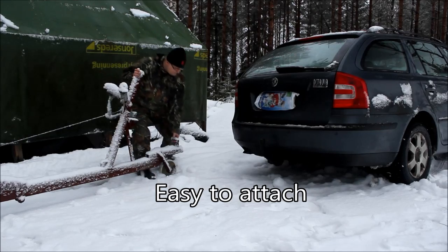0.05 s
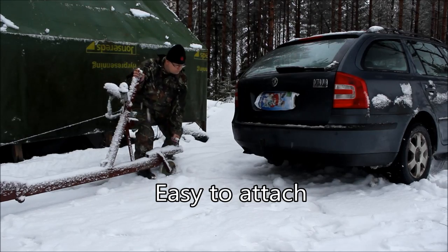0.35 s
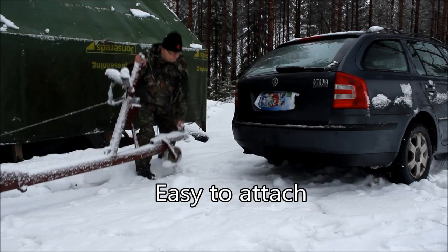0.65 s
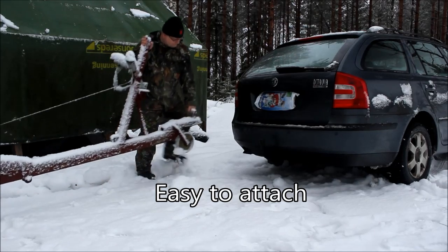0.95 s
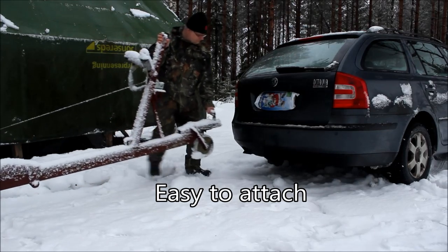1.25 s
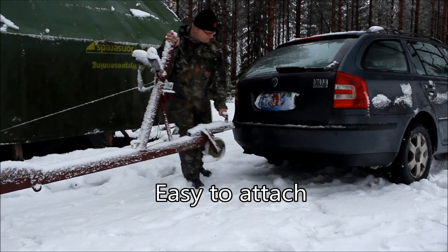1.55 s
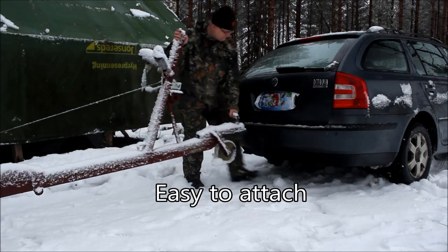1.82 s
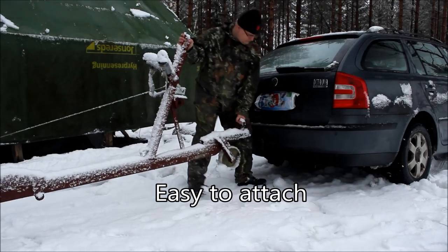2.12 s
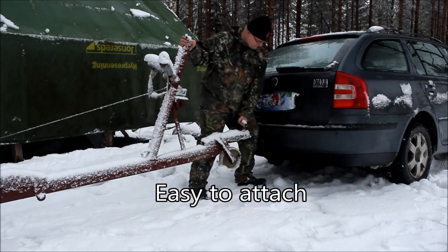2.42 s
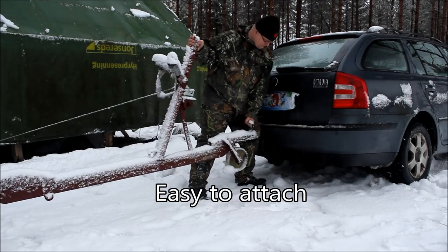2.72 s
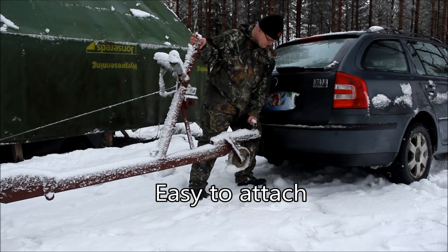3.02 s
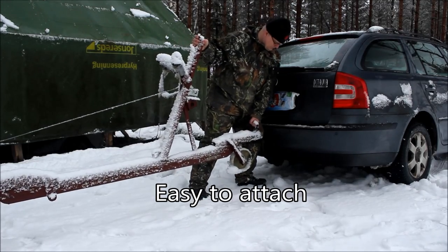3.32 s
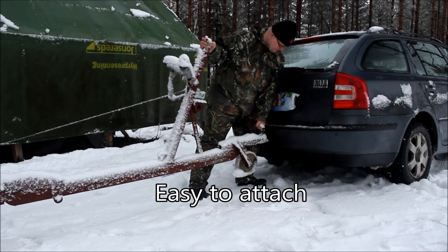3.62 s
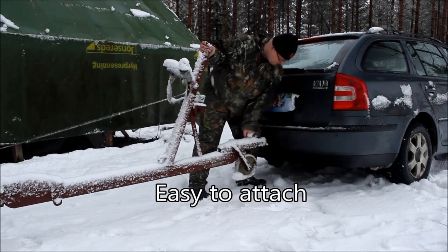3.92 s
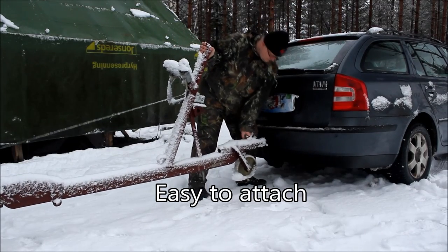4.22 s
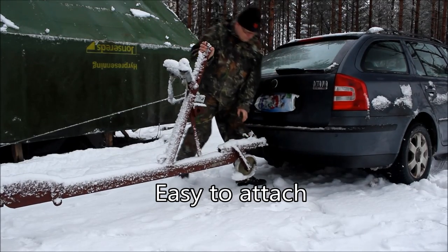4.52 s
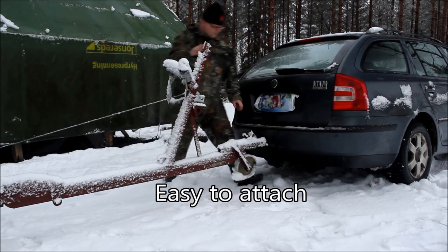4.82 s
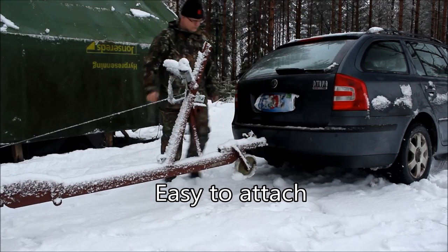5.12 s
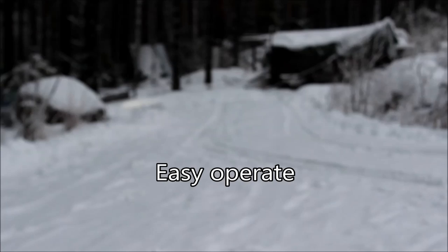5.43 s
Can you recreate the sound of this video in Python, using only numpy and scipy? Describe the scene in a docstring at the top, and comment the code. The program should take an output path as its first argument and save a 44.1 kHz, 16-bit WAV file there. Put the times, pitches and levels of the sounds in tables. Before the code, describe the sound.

In quiet, snowy outdoor air, uneven footsteps crunch and scuff, with light fabric rustle and small icy snaps. Then steel knocks on steel and a trailer hitch lands with a loud, ringing clank and a low hollow rumble. Bright clinks follow and weaken among dull footfalls, before a brief, faint hum of a car driving on snow. The sound is fairly close and dry, with only a slight dull tail.

```python
"""A steel trailer coupler scrapes and drops onto a car's tow ball with a clank: the drawbar rings,
the hollow body rumbles and a loose steel part rattles to rest. Leading up to it, a man drags the
drawbar through cold snow, which crunches, slides and packs under his boots as his clothes swish.
At the very end the scene changes to a car running along a snowy track."""
import sys
import numpy as np
from scipy import signal
from scipy.fft import rfft, irfft
from scipy.io import wavfile
from scipy.ndimage import uniform_filter1d

SR = 44100
rng = np.random.default_rng(int(sys.argv[2]) if len(sys.argv) > 2 else 0)


def wav_out(sig):
    """Save sig, one row per channel (or a flat mono array), as 16-bit PCM at SR to the path in sys.argv[1]."""
    wavfile.write(sys.argv[1], SR, np.round(np.clip(np.atleast_2d(sig).T, -1, 1) * 32767).astype(np.int16))


N = 249606
TIME = np.arange(N) / SR


def from_db(db):
    """Decibels to gain."""
    return 10 ** (np.asarray(db) / 20)


def rms_one(x):
    """Scale to rms 1."""
    return x / np.sqrt(np.mean(x ** 2) + 1e-20)


def fade(t, t60):
    """A decay that falls 60 dB in t60 seconds."""
    return 1000.0 ** (-t / max(t60, 1e-3))


def add(out, s, sound):
    """Mix a sound in at s seconds."""
    start = int(s * SR)
    out[start:start + len(sound)] += sound[:N - start]


def band(x, low_hz, high_hz, order=2):
    """High-pass, then low-pass; rms 1."""
    low_cut = signal.butter(2, min(low_hz, SR / 3), "high", fs=SR, output="sos")
    high_cut = signal.butter(order, min(high_hz, SR / 3), fs=SR, output="sos")
    return rms_one(signal.sosfilt(high_cut, signal.sosfilt(low_cut, x + 1e-18)))


def coloured(x, spectrum):
    """Shape a steady texture with an EQ curve; rms 1."""
    hz, db = np.transpose(spectrum)
    bins_hz = np.maximum(np.fft.rfftfreq(N, 1 / SR), 1)
    gain = from_db(np.interp(np.log(bins_hz), np.log(hz), db))
    return rms_one(irfft(rfft(x) * gain, N))


def grains(per_s, spread_db, size=N):
    """Random tiny fractures of uneven strength; rms 1."""
    strength = from_db(spread_db * np.minimum(rng.exponential(1, size), 4))
    polarity = rng.choice([-1, 1], size)
    return rms_one(strength * polarity * (rng.random(size) < per_s / SR))


def pop(t, hz, cycles):
    """A rounded pulse that swells for the given number of cycles, then dies; height 1."""
    age = t * hz / cycles
    wave = age * np.exp(-age) * np.sin(2 * np.pi * hz * t)
    return wave / np.abs(wave).max()


def struck(t, modes, vary_db):
    """Every blow excites each mode with a strength and sign of its own."""
    ring = np.zeros(len(t))
    for hz, db, t60 in modes:
        strength = from_db(db + vary_db * rng.standard_normal()) * rng.choice([-1, 1])
        ring += strength * fade(t, t60) * np.sin(2 * np.pi * hz * t)
    return ring


def air():
    """A soft, dark bed of outdoor air."""
    # The air's tone. Each row: frequency in Hz, relative level in dB.
    air_spectrum = [(15, -48), (25, -7.5), (195, -1.5), (229, -1.5), (270, -2.5), (427, -2.5), (516, -4),
                    (607, -7.5), (659, -4.5), (863, -7), (1700, -15), (4870, -20), (5880, -22.5),
                    (16000, -29)]
    return from_db(-48) * coloured(rng.standard_normal(N), air_spectrum)


def car(start_s=5.485, fade_in_s=0.0069):
    """Low engine hum under the rush of tyres on snow."""
    # The engine's tones. Each row: frequency in Hz, rms level in dB.
    engine_tones = [(42, -49), (70, -52), (132, -54)]
    # The tyre rush. Each row: frequency in Hz, relative level in dB.
    tyre_spectrum = [(15, -28), (25, -3), (138, -13), (219, -27), (243, -40), (358, -25), (451, -11),
                     (569, -17), (665, -14), (737, -14.5), (1970, -17), (10000, -42), (12000, -57),
                     (15600, -76), (22000, -120)]
    hum = sum(np.sqrt(2) * from_db(db) * np.sin(2 * np.pi * (hz * TIME + rng.random()))
              for hz, db in engine_tones)
    tyres = from_db(-45) * coloured(rng.standard_normal(N), tyre_spectrum)
    return (hum + tyres) * np.clip((TIME - start_s) / fade_in_s, 0, 1)


def clearing(x, predelay_s=0.012):
    """Snow swallows most sound; the trailer wall and the trees scatter a faint dull tail."""
    t = TIME[:SR]
    scatter = band(rng.standard_normal(len(t)), low_hz=111, high_hz=1920)
    tail = scatter * fade(t, t60=0.39) * (t > predelay_s)
    return x + from_db(-24) * signal.fftconvolve(x, tail / np.linalg.norm(tail))[:N]


def thuds():
    """Heavy footfalls come through the ground as dull thuds."""
    # Each row: start in seconds, peak in dB, pitch in Hz.
    footfalls = [(4.459, -39, 53.5), (4.716, -31.5, 42.2), (4.782, -35, 58.3), (4.832, -30.5, 58.7),
                 (4.9, -36, 47.7)]
    out = np.zeros(N)
    for s, db, hz in footfalls:
        add(out, s, from_db(db) * pop(TIME[:SR // 4], hz, cycles=0.42))
    return out


def ticks():
    """Ice and clothing give short, bright snaps."""
    # Each row: start in seconds, level in dB, frequency in Hz that the filters follow.
    snaps = [(0.464, -42.5, 2600), (0.602, -39, 3470), (0.658, -38.5, 2300), (0.802, -33, 2490),
             (0.8233, -31, 2120), (0.906, -27, 1880), (1.047, -33, 4160), (1.283, -38, 2830),
             (1.406, -38, 2420), (1.487, -35, 7000), (2.245, -46, 10500), (2.425, -39, 2600),
             (2.925, -33, 1040), (3.045, -34.5, 1700), (3.284, -37, 1460), (3.944, -35, 7000),
             (5.208, -42, 7500)]
    out, t = np.zeros(N), TIME[:SR // 10]
    for s, db, hz in snaps:
        snap = band(rng.standard_normal(len(t)), low_hz=0.91 * hz, high_hz=0.77 * hz)
        add(out, s, from_db(db) * snap * fade(t, t60=0.053))
    return out


def footwork(range_db=23, sag_db_per_s=8):
    """Envelopes for slide, swish and packing: each step rises, sags under the weight and releases."""
    # Strides and shuffles. Each row: landing time, rise, hold and release in seconds,
    # then relative levels in dB of boot slide, clothes swish and snow packing.
    steps = [(0.499, 0.081, 0.0083, 0.14, -47.5, -52, -47), (0.659, 0.041, 0.15, .04, -45.5, -58, -58),
             (0.827, .03, 0.14, 0.22, -37.5, -56.5, -50), (1.119, 0.23, 0.05, .14, -33, -44, -45),
             (1.536, 0.28, 0.27, 0.099, -33.5, -49.5, -42.5), (1.984, .06, 0.0093, 0.1, -43.5, -53, -39.5),
             (2.277, 0.033, .035, 0.045, -39, -51.5, -40), (2.423, 0.21, 0.077, 0.084, -54, -63, -62),
             (2.609, 0.13, 0.24, 0.13, -36.5, -59.5, -47), (3.285, .015, 0.029, 0.039, -38.5, -64, -45),
             (3.376, 0.027, 0.21, 0.14, -36, -57, -39.5), (3.635, .12, 0.14, 0.065, -35.5, -52.5, -33.5),
             (4.628, 0.1, 0.18, .22, -44, -53.5, -53), (5.017, 0.12, 0.093, .06, -60, -74, -44.5),
             (5.296, 0.23, 0.052, 0.069, -51, -60, -50)]
    power = np.zeros((3, N))
    for s, rise, hold, release, *levels_db in steps:
        t = TIME - s
        away = np.maximum(-t, 0) / rise + np.maximum(t - hold, 0) / release   # 0 during the hold
        effort = from_db(-range_db * np.minimum(away, 10) - sag_db_per_s * np.clip(t, 0, hold))
        power += np.outer(from_db(levels_db), effort) ** 2
    return np.sqrt(power)


def walking():
    """Soles shear fine crystals, fabric rubs, and weight packs the snow in coarse grains."""
    # The tone of sliding soles and of cloth. Each row: frequency in Hz, relative level in dB.
    slide_spectrum = [(130, -8), (250, 1), (430, -1), (600, -1), (870, 1.5), (1460, -4.5), (2100, -2.5),
                      (3300, -8.5), (4400, -15.5), (6300, -20.5), (8000, -29.5), (12000, -52), (16000, -55)]
    cloth_spectrum = [(2000, 3), (4500, 2.5), (6400, 0.5), (8500, -4.5), (12000, -8.5), (16000, -8.5)]
    slide, swish, packing = footwork()
    crystals = coloured(grains(per_s=5500, spread_db=3), slide_spectrum)
    fabric = coloured(grains(per_s=25000, spread_db=4.5), cloth_spectrum)
    lumps = band(grains(per_s=770, spread_db=5.5), low_hz=117, high_hz=527)
    return from_db(1) * slide * crystals + from_db(7.5) * swish * fabric + packing * lumps


def crunches():
    """Snow collapses under a boot in one pop with a faint snap, then smaller pieces crumble."""
    # Each row: start in seconds, level in dB, pitch in Hz, crumble in dB relative to the pop.
    collapses = [(0.835, -25, 385, -5), (0.9071, -13.5, 254, -6.5), (1.1122, -24, 320, -18),
                 (1.1691, -18, 241, -18), (1.179, -21, 270, -13), (1.1978, -20.5, 273, -9),
                 (1.333, -27, 207, -18), (1.576, -20.5, 261, -15), (1.5933, -19, 308, -20),
                 (1.6474, -18.5, 226, -11), (1.7296, -22, 231, -3.5), (1.8253, -24.5, 209, -22),
                 (1.8577, -30, 220, -15), (1.9479, -32.5, 358, -4), (1.9684, -25.5, 520, -18),
                 (1.9845, -19, 259.4, -4), (2.0851, -18.5, 504, -18), (2.269, -25, 287, 0.5),
                 (2.3152, -24, 288, -15), (2.536, -15, 220, -10.5), (2.5666, -17, 271, -9.5),
                 (2.5955, -24, 222, -21), (2.9279, -21, 395, -13), (2.9847, -19.5, 380, -15.5),
                 (3.0446, -25, 270, -6.5), (3.1044, -24, 254, -9), (3.65, -14.5, 204, -25),
                 (4.7804, -26.5, 450, -4.5), (5.014, -33.5, 353, -6), (5.0386, -31, 344, -13),
                 (5.0798, -28, 396, -16), (5.3153, -28.5, 396, -7)]
    out, t = np.zeros(N), TIME[:SR // 8]
    for s, db, hz, crumble_db in collapses:
        crumbs = band(grains(per_s=2300, spread_db=0, size=len(t)), 0.15 * hz, 3.43 * hz, order=3)
        crumble = from_db(crumble_db) * crumbs * fade(t, t60=0.063)
        crack = band(rng.standard_normal(len(t)), low_hz=hz, high_hz=1400, order=1)
        snap = from_db(-24.5) * crack * fade(t, t60=0.042)
        add(out, s, from_db(db) * (pop(t, hz, cycles=0.33) + snap + crumble))
    low_cut = signal.butter(2, 70, "high", fs=SR, output="sos")
    return signal.sosfilt(low_cut, out + 1e-18)


def shudder(rise_s=0.0051, t60=0.42):
    """The big hollow trailer body rumbles when its drawbar is jolted."""
    # Each row: start in seconds, level in dB.
    jolts = [(3.43, -33.5), (3.548, -26), (3.734, -16.5), (3.81, -15.5), (3.971, -29)]
    # The body's hollow resonances. Each row: frequency in Hz, relative level in dB.
    body_spectrum = [(25, -28), (52, 1), (85, -5), (120, 2.5), (160, -5), (215, -4.5), (280, -6), (350, -3),
                     (700, -26), (2000, -50)]
    envelope, t = np.zeros(N), TIME[:SR]
    for s, db in jolts:
        add(envelope, s, from_db(db) * np.minimum(t / rise_s, fade(t - rise_s, t60)))
    return envelope * coloured(rng.standard_normal(N), body_spectrum)


def loose_part(note_peak_s=0.014, buzz_s=0.023):
    """Loose steel swings against its stop: a buzz, a swelling note, a ring choked as it settles."""
    # Each row: start in seconds, level in dB.
    clinks = [(3.915, -18), (4.0104, -13), (4.1084, -20), (4.144, -31.5), (4.208, -28), (4.2344, -25),
              (4.3093, -29), (4.3995, -26.5), (4.4884, -27), (4.577, -30.5), (4.7547, -33.5), (4.8408, -41),
              (4.9357, -39.5), (5.1676, -40), (5.2562, -43), (5.3156, -36)]
    # The part's modes. Each row: frequency in Hz, relative level in dB, unchoked t60 in seconds.
    part_modes = [(875, 0, 0.048), (1080, -2, 0.023), (1174, -10.5, 0.063), (1287, -3, 0.04),
                  (1602, 1.5, 0.04), (1690, -6, 0.022), (2050, -3.5, 0.036), (2250, -10, 0.06),
                  (2340, -7.5, 0.065), (2620, -5, 0.12), (2667, -7, 0.38), (2850, -5.5, 0.071),
                  (3020, -5.5, .07), (2984, -4, 0.056), (3310, -8, 0.11), (3470, -13, 0.085),
                  (3630, -10, 0.086), (3690, -3.5, 0.059), (5200, -18, 0.066), (5400, -13.5, 0.057),
                  (5880, -10.5, 0.063), (6100, -15, .05), (7140, -15, 0.046), (6600, -15, .04),
                  (7660, -17, 0.029), (7340, -12, 0.058), (9000, -18.5, .04), (10500, -23, 0.041)]
    out, t = np.zeros(N), TIME[:SR // 3]
    swell = (t / note_peak_s) ** 2
    pair = np.sin(2 * np.pi * 2667 * t) + 0.36 * np.sin(2 * np.pi * 2590 * t)   # two close modes beat
    note = swell * np.exp(1 - swell) * pair
    choke = np.interp(t, [0, .004, .018, .032, .07], [.7, 1, 1, .3, 0])
    for s, db in clinks:
        contact = rng.standard_normal(len(t))
        buzz = band(contact, low_hz=880, high_hz=2930, order=4)
        sizzle = from_db(-18.5) * band(contact, low_hz=5330, high_hz=7740)
        touch = (buzz + sizzle) * np.exp(-(t / buzz_s) ** 2)
        detune = 1 + 0.0014 * rng.standard_normal()   # the pitch shifts with how the part lies
        tilt_db_per_octave = 0.47 * (db + 20)   # harder touches reach more of the high modes
        modes = [(hz, level + tilt_db_per_octave * max(0, np.log2(hz / 3000)), t60)
                 for hz, level, t60 in part_modes]
        ring = choke * struck(detune * t, modes, vary_db=2)
        add(out, s, from_db(db) * (from_db(-14) * touch + from_db(-6) * ring + from_db(-6.5) * note))
    return out


def coupler():
    """Steel grinds and knocks on steel; the drawbar rings with the modes that each contact reaches."""
    # Each row: start in seconds, level in dB, low and high band edges in Hz, t60 in seconds.
    knocks = [(0.502, -25, 900, 990, 0.037), (3.436, -25.5, 222, 890, 0.13), (3.531, -29, 766, 2200, 0.055),
              (3.692, -31.5, 300, 5000, 0.085), (3.734, -20.5, 890, 2340, 0.23),
              (3.738, -8, 151, 307, 0.089), (3.741, -17, 480, 686, .12), (3.762, -27, 1770, 2870, .13),
              (3.8043, -9, 800, 3000, 0.043), (3.807, -4, 483, 2280, 0.07),
              (3.8139, -12.5, 790, 3100, 0.12), (3.8312, -1.5, 895, 3740, 0.03),
              (3.890, -24, 1500, 2980, .04), (3.895, -9.5, 610, 3130, 0.14),
              (3.955, -16.5, 600, 2380, 0.17), (3.989, -21, 580, 2100, 0.16),
              (4.079, -30.5, 2520, 6900, 0.058)]
    # The drawbar's ring. Each row: frequency in Hz, relative level in dB, t60 in seconds.
    drawbar_modes = [(570.5, -6.5, 0.092), (768, -15, 0.17), (994, -5.5, 0.072), (1047, -13, 0.088),
                     (1160, -14, 0.13), (1560, -8, 0.073), (1640, -40, 0.11), (1830, -18, 0.086),
                     (1960, -42, 0.11), (2170, -34, 0.1), (2544, -10.5, 0.093), (2660, -32, 0.09),
                     (2800, -30, .1), (3647, -29, .08)]
    # Single hard steel-on-steel transients. Each row: start in seconds, peak in dB, pitch in Hz.
    hard_hits = [(3.4296, -14.5, 2500), (3.5315, -14.5, 1320), (3.826, -10, 8000), (3.8314, 3.5, 3080),
                 (3.8954, 3, 2280)]
    out, t = np.zeros(N), TIME[:SR]
    for s, db, low_hz, high_hz, t60 in knocks:
        contact = rng.standard_normal(len(t))
        grit = from_db(-31) * high_hz / 3000 * contact   # harder contacts shed more treble
        crash = (band(contact, low_hz, high_hz, order=3) + grit) * fade(t, t60)
        reached = [(hz, level - 10 * np.log10(1 + (hz / high_hz) ** 4 + (low_hz / hz) ** 4), ring_s)
                   for hz, level, ring_s in drawbar_modes]
        drive = from_db(2) * np.sqrt(t60 / (t60 + 0.044))   # a brief touch feeds the ring less
        add(out, s, from_db(db) * (crash + drive * struck(t, reached, vary_db=2.5)))
    for s, db, hz in hard_hits:
        add(out, s, from_db(db) * pop(t, hz, cycles=0.41))
    return out


def scene():
    """Mono mix: man and trailer in the clearing over a bed of air, with the car at the end."""
    bed = air()
    man = walking() + crunches() + thuds() + ticks()
    trailer = coupler() + shudder() + loose_part()
    return (clearing(man + trailer) + car() + bed)[None]


def record(dry, threshold_db=-13.5, attack_s=0.013, release_db_per_s=46):
    """A limiter ducks everything after a loud blow and recovers; peaks clip and the top is cut."""
    power = uniform_filter1d(dry[0] ** 2, size=128)
    level_db = 10 * np.log10(np.maximum(power, 1e-12))
    over_db = np.maximum(level_db - threshold_db, 0)
    recovery_db = release_db_per_s * TIME
    duck_db = np.maximum.accumulate(over_db + recovery_db) - recovery_db
    pole = np.exp(-1 / (attack_s * SR))
    limited = dry * from_db(-signal.lfilter([1 - pole], [1, -pole], duck_db))
    high_cut = signal.ellip(12, .1, 80, 15900, fs=SR, output="sos")
    return signal.sosfilt(high_cut, np.clip(limited, -.92, .92))


dry = scene()
out = record(dry)
wav_out(out)
```